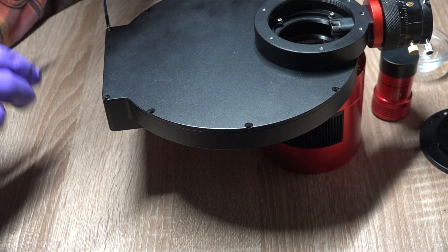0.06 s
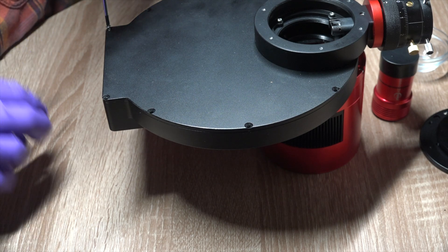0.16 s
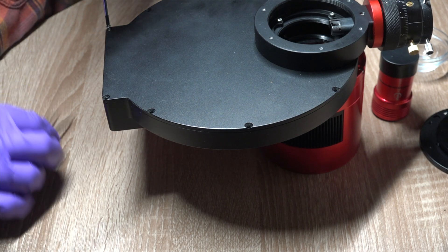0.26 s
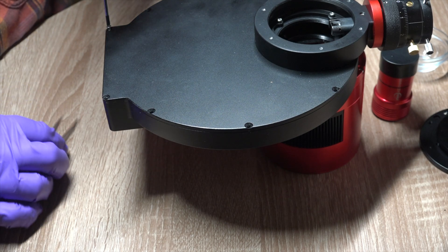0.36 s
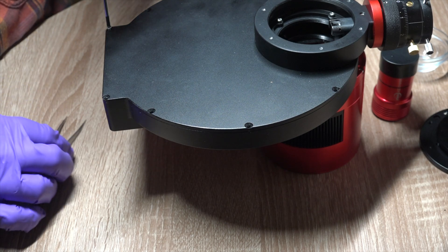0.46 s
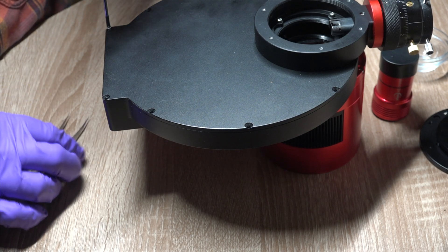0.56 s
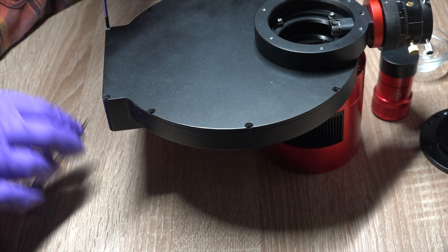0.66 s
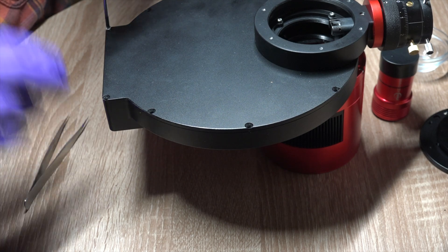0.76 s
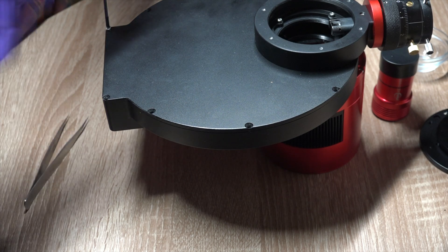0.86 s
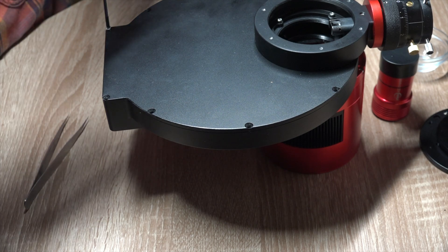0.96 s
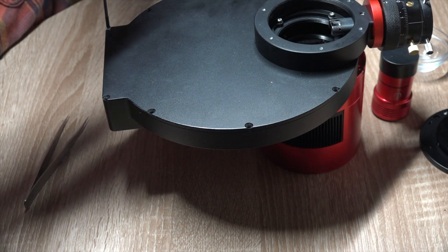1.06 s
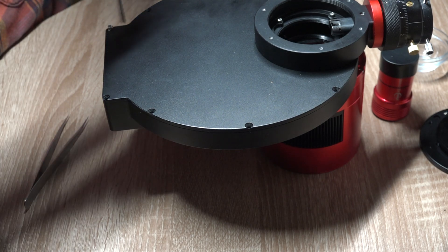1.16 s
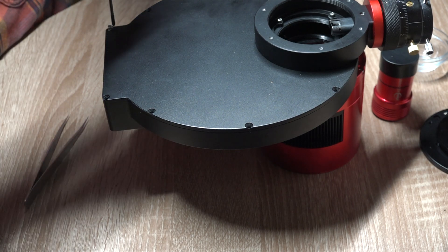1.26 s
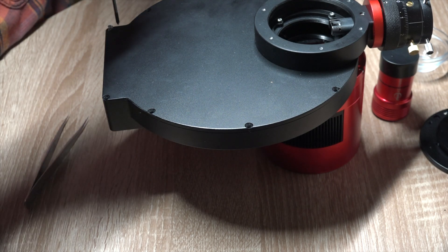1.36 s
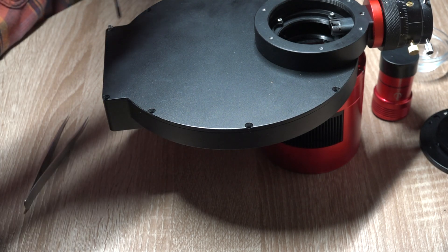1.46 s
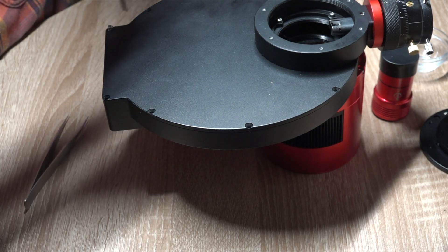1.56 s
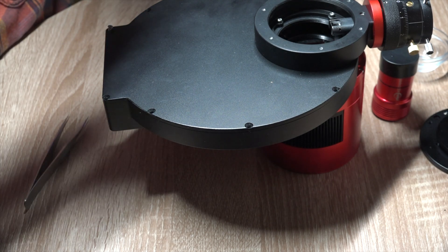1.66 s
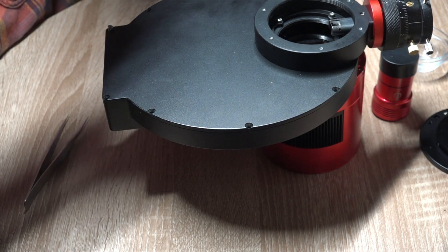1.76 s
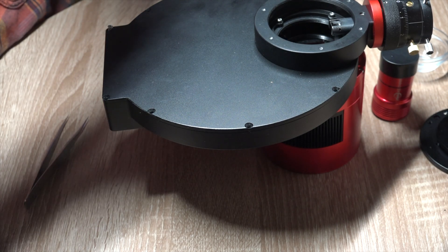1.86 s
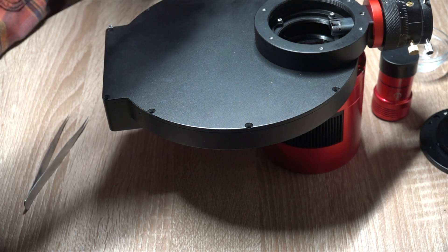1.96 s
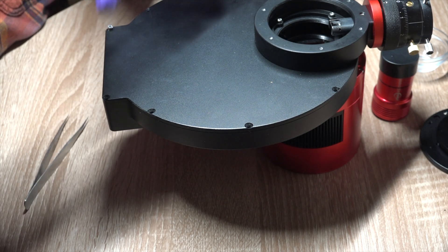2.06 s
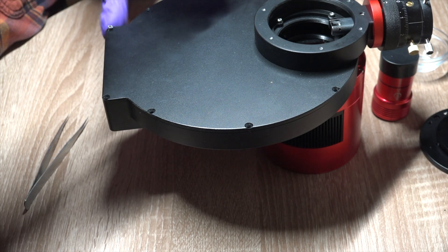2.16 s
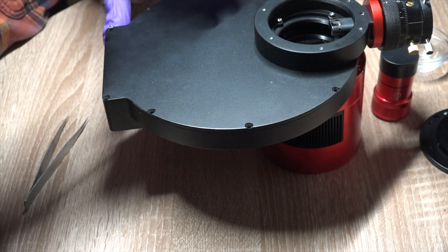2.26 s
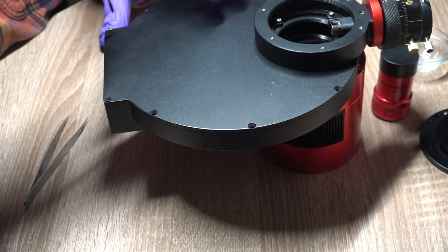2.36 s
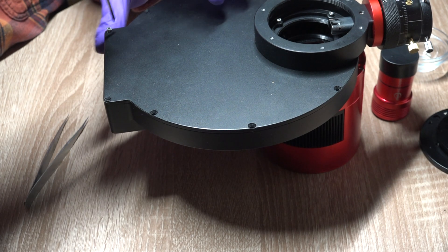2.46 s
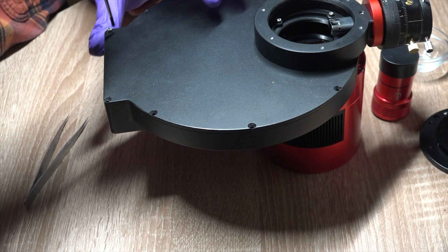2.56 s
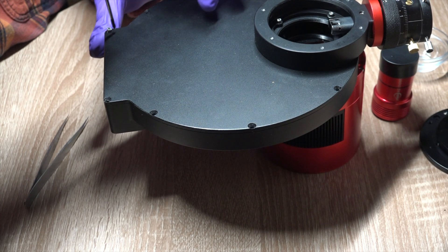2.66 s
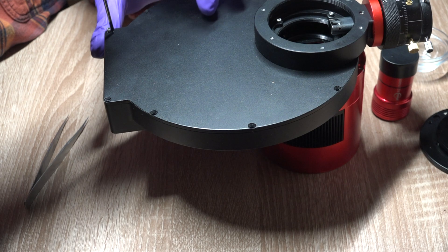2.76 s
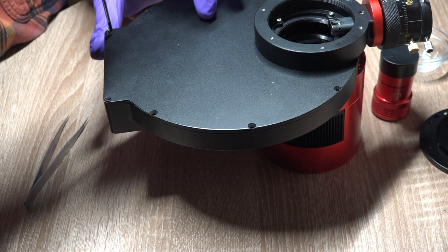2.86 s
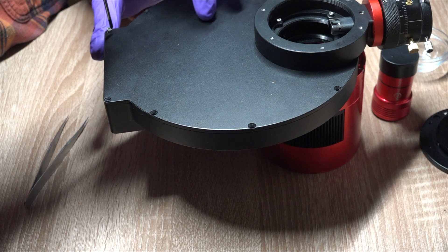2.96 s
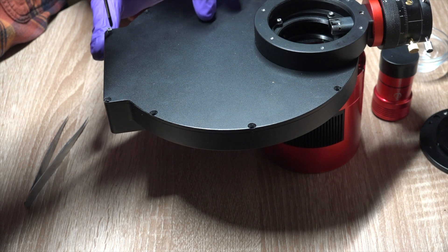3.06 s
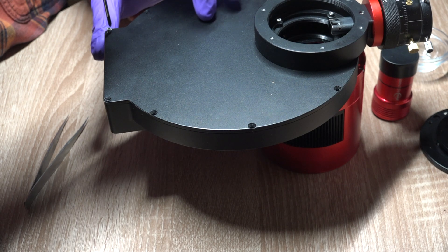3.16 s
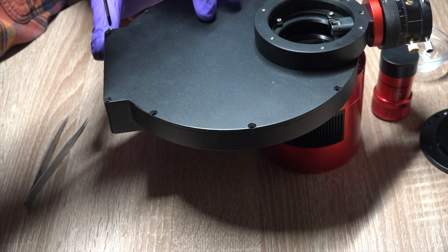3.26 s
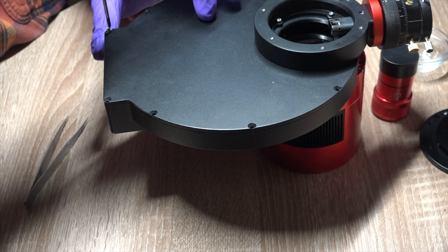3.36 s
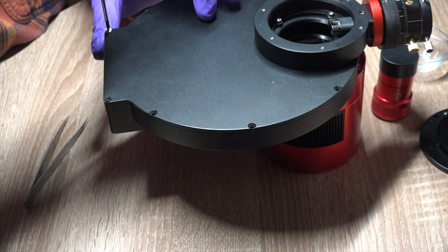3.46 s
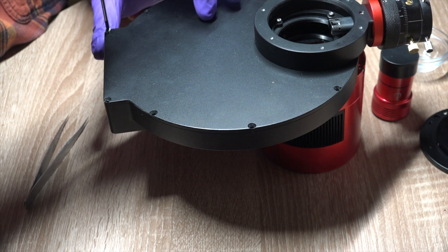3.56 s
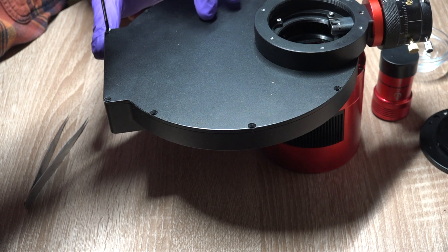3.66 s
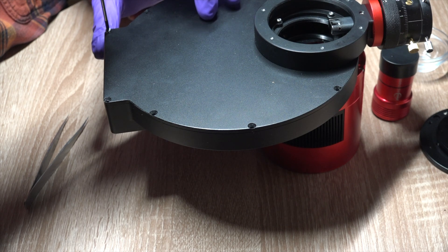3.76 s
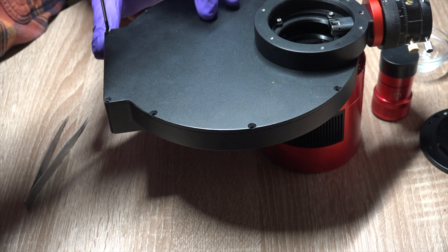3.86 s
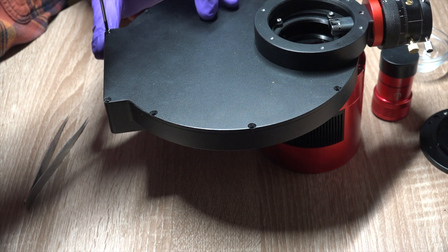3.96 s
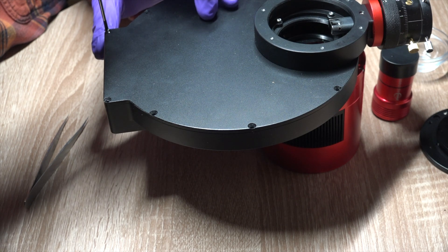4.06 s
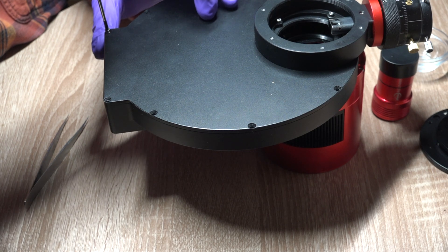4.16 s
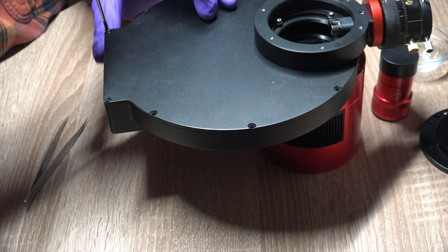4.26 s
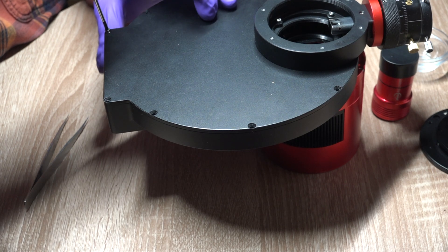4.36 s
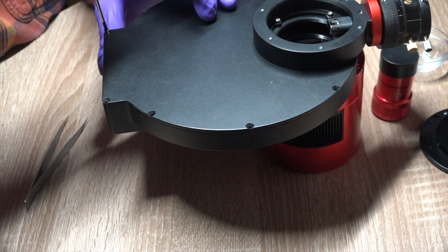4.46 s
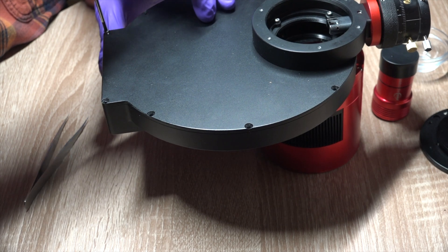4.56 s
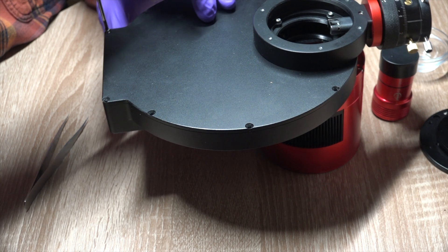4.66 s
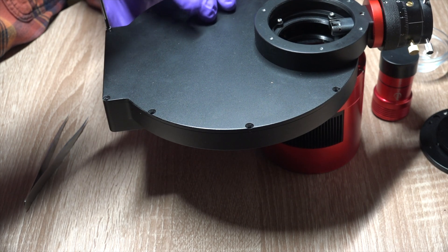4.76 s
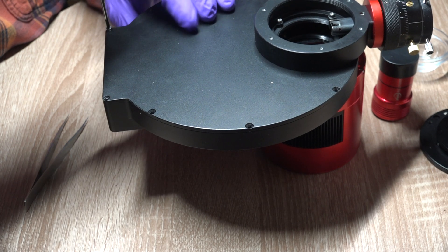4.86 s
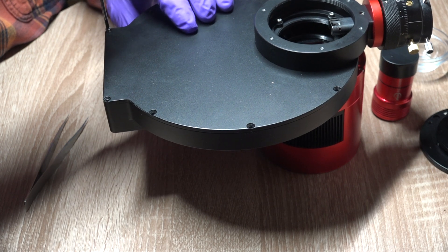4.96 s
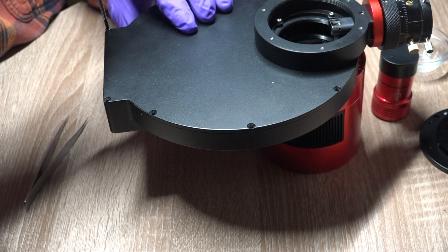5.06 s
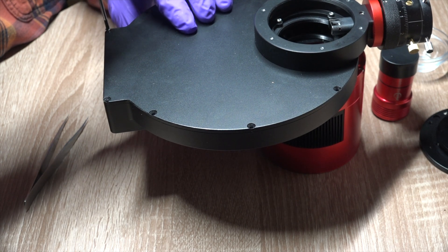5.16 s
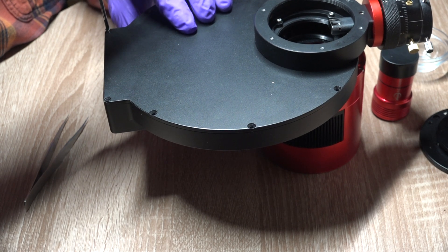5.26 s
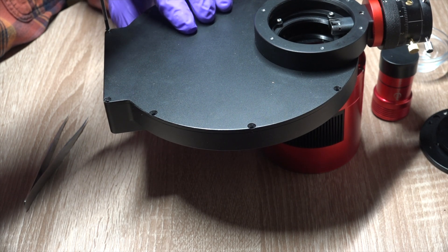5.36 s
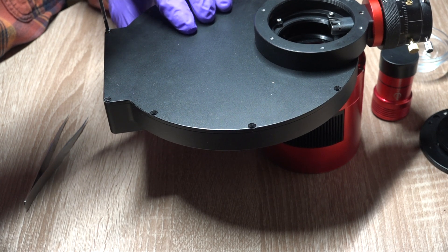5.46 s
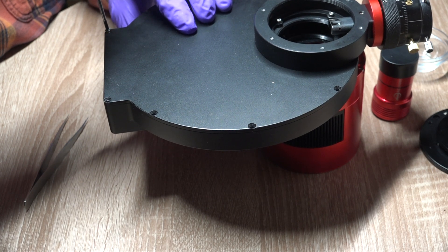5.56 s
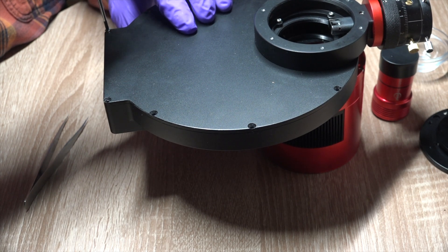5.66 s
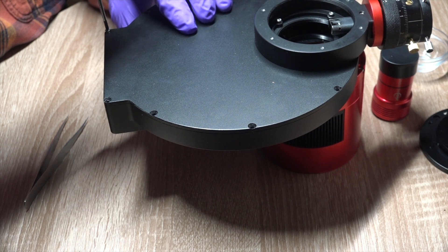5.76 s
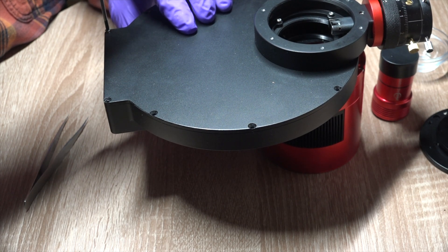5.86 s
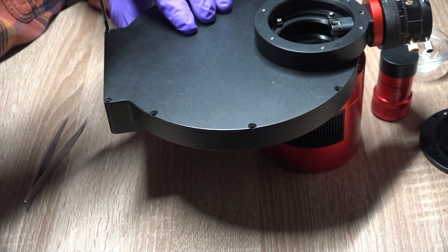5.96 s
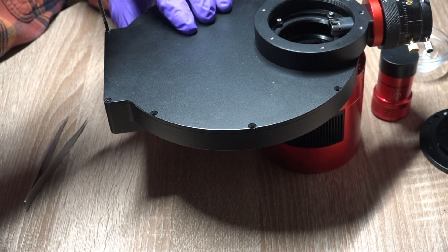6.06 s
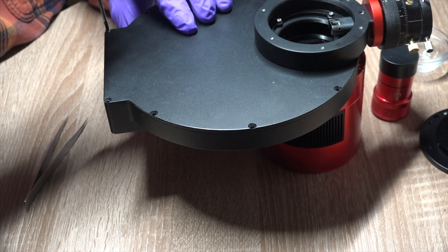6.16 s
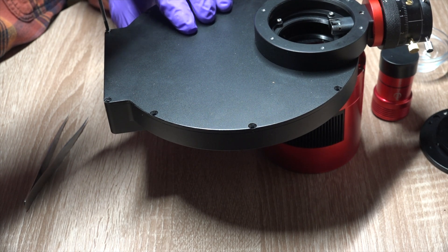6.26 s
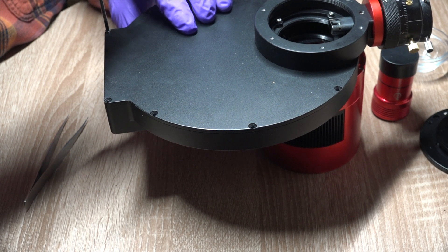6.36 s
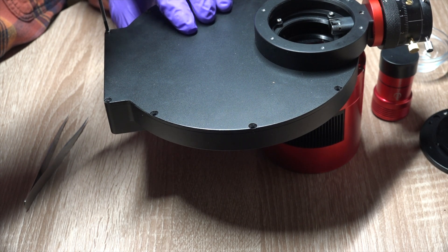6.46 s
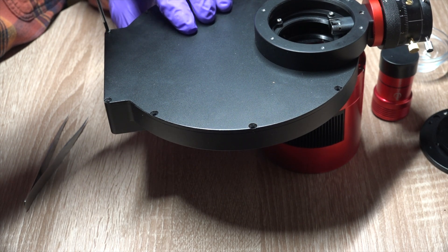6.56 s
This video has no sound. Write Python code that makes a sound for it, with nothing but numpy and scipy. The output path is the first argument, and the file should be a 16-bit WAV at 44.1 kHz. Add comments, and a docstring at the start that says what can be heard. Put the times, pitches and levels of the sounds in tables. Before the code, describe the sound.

Close tabletop work: tweezers click and slide on wood, gloves tick softly, small metal parts chink among low thuds, with quiet machine purr behind.

```python
"""Tweezers, key and screws at a wooden table

Steel tweezers are laid on the table and slid away; a thin key taps a metal housing and turns tiny screws. Low
thumps sound on the table, dull thuds come with a swish of cloth, gloves rustle and tick. Contacts are grainy
noise bursts ringing damped modes, rubbing is flickering coloured noise, and echoes follow. Behind lie a
machine's wavering sine hum, the knocking purr of a camera's lens drive and noise for the air."""
import sys
import numpy as np
from scipy import signal
from scipy.fft import rfft, irfft
from scipy.io import wavfile
from scipy.ndimage import uniform_filter1d

SR = 44100
rng = np.random.default_rng(int(sys.argv[2]) if len(sys.argv) > 2 else 0)


def wav_out(sig):
    """Save sig, one row per channel (or a flat mono array), as 16-bit PCM at SR to the path in sys.argv[1]."""
    wavfile.write(sys.argv[1], SR, np.round(np.clip(np.atleast_2d(sig).T, -1, 1) * 32767).astype(np.int16))


N = 291942  # length in samples

# dull thuds about twice a second, perhaps steps: t/s, level/dB, time to full pressure/ms, favoured f/Hz
THUD_HITS = [(4.738, -29, 4.6, 294), (5.279, -31.5, 2.5, 280), (5.757, -28.5, 3.2, 270),
             (6.254, -38.5, 5, 203)]
# modes of the wooden table top: f/Hz, level/dB
TABLE_MODES = [(108, -15.5), (135, 6), (180, 0), (250, -33), (335, 7), (450, -3.5), (620, 8.5), (760, 3.5),
               (1110, 7.5), (1400, 1), (2000, 4.5), (4400, -18.5)]
TABLE_T60_S = .016  # at 1 kHz
# modes of glove material: f/Hz, level/dB
GLOVE_MODES = [(2000, 16.5), (3500, 7.5), (5000, 9), (6500, 5), (8500, 8), (12000, -47)]
GLOVE_T60_S = .005  # at 1 kHz


def tweezer_hits():
    """Steel tweezers touch the table and ring briefly, damped by fingers and wood."""
    # contacts: t/s, level/dB, time to full pressure/ms, favoured f/Hz
    hits = [(.314, -46.5, 2.4, 2500), (.437, -18, 1.78, 1890), (.533, -41, 0.26, 2450),
            (.538, -22.5, 0.91, 2300), (.593, -36, 0.17, 2800), (.917, -49, 1.1, 3640),
            (1.112, -32.5, 6.7, 1010), (1.127, -29.5, 0.71, 2620), (1.136, -31, 4.8, 3730),
            (1.242, -23, 0.45, 1660), (1.258, -27.5, 0.69, 2660), (1.264, -30, 3.5, 2810),
            (1.310, -34.5, 0.9, 2480)]
    # steel modes: f/Hz, level/dB
    modes = [(380, 2), (590, 5), (1061, -2), (1300, 6), (1700, 6), (1950, 0), (2620, -6.5), (3100, -24),
             (3220, 4.5), (3800, -1), (3990, 4.5), (4600, 4), (4850, -1.5), (5529, 3), (6200, 2.5),
             (7154, 5), (7800, 6), (8866, -5.5), (11510, 4)]
    return strike(hits, modes, t60_s=.026, crack_db=-12,
                  least_fall_ms=3.2, fall_per_rise=2.1, spread_octaves=1.264, pan_db=1.1)


def tweezer_slide():
    """Tweezers drag over the wood grain: the noise catches at once, holds and fades evenly in dB."""
    # spectrum of the drag: f/Hz, level/dB
    spectrum = [(100, -38), (300, -16), (600, -10.5), (1200, -8.5), (2000, -3), (3200, -8.5), (5000, -14.5),
                (6200, -34), (8200, -37), (11000, -59), (15000, -48.5)]
    start_s, rise_s, hold_s, full_db = .512, .03, .071, -20.5
    full_s = start_s + rise_s
    slows_s = full_s + hold_s
    gain = stroke([(start_s, full_db - 26), (full_s, full_db),
                   (slows_s, full_db - 1.0), (slows_s + .5, full_db - 103.5)])
    return rub(colour(grit(N, 5.2), spectrum), gain, flicker_db=2.5, rate=180, pan_db=1.0)


def housing_taps():
    """The key taps a metal housing, whose modes ring for a moment."""
    # contacts: t/s, level/dB, time to full pressure/ms, favoured f/Hz
    hits = [(2.720, -52, 0.5, 2500), (2.765, -27.5, 1.6, 1610), (3.460, -57, 2.4, 2990),
            (3.476, -43.5, 0.59, 3060), (3.497, -44, 1.3, 2560), (3.548, -39.5, 1.8, 1500),
            (3.562, -45, 3, 1820), (4.105, -42, 22, 1460), (4.138, -44.5, 6, 1070)]
    # housing modes: f/Hz, level/dB
    modes = [(415, 1.5), (565, -14), (646, 8.5), (1290, 6), (1750, -3), (1900, 1), (2153, -11), (2665, 1),
             (3031, -4.5), (3488, 1), (3950, -1.5), (4457, 2.5), (4786, 0.5), (5491, -7), (7700, -1)]
    return strike(hits, modes, t60_s=.02, crack_db=-14.5,
                  least_fall_ms=8.9, fall_per_rise=0.26, spread_octaves=1.27, pan_db=0.74)


def screw_chinks():
    """Screw and key chink together, all modes shifting in pitch from contact to contact."""
    # contacts: t/s, level/dB, time to full pressure/ms, favoured f/Hz, reference ring f/Hz
    hits = [(4.698, -53.5, 3, 2000, 1910), (4.945, -45, 2.6, 2440, 2100), (4.959, -19, 6.6, 3020, 1746),
            (4.972, -35, 6.8, 1970, 1860), (4.983, -24, 1, 4000, 1784), (5.524, -40.5, 8.2, 1820, 1885),
            (5.568, -26.5, 0.99, 2800, 1764), (6.399, -43, 15, 3750, 1830), (6.450, -28.5, 22, 1850, 1808),
            (6.469, -18, 6.2, 3170, 1553), (6.503, -34, 2.2, 2690, 1630)]
    # modes of screw and key: multiple of the reference ring, level/dB
    modes = [(.68, -2), (.86, -38), (0.921, -22.5), (1, 14.5), (1.072, 14), (1.68, 9), (1.8, -24.5),
             (1.941, 13), (2.003, 8.5), (2.1, 0), (2.6, 1.5), (2.85, 3), (3.11, 5), (3.24, -1), (4.3, -5)]
    return strike(hits, modes, t60_s=.036, crack_db=-12,
                  least_fall_ms=5.3, fall_per_rise=0.82, spread_octaves=0.8, pan_db=0.6)


def key_grind():
    """The key grinds faintly in the screw head: noise rings it, swelling to each slip and then dying."""
    # turns: start t/s, slip t/s, level at the slip/dB
    turns = [(5.446, 5.482, -50), (5.83, 5.995, -53.5), (6.038, 6.077, -45.5)]
    # key modes: f/Hz, level/dB
    modes = [(1200, -27), (2100, 3), (2450, 1), (3000, 1), (3500, 5), (4750, 1)]
    swell_db, release_s = 13, 0.049
    gain = 0
    for start_s, slip_s, db in turns:
        gain = gain + stroke([(start_s, db - swell_db), (slip_s, db), (slip_s + release_s, db - swell_db)])
    grinding = signal.fftconvolve(grit(N, 1.1), damped(modes, .03))[:N]
    return rub(grinding, gain, flicker_db=3, rate=60, pan_db=1)


def pings():
    """Light touches each leave one thin tone ringing close to the favoured pitch."""
    # touches: t/s, level/dB, time to full pressure/ms, favoured f/Hz
    touches = [(.314, -42.5, 3.8, 392), (0.444, -36, 2.7, 3150), (1.263, -24, 2.57, 2693),
               (4.022, -54, .5, 3110), (5.338, -39.5, 7.1, 3530), (6.475, -20.5, 4.7, 3060)]
    hits = [(*touch, touch[-1]) for touch in touches]  # the favoured pitch also tunes the tone
    return strike(hits, [(0.96, 0)], t60_s=0.048, crack_db=-21,
                  least_fall_ms=6, fall_per_rise=.3, spread_octaves=.15, pan_db=1.2)


def low_thumps():
    """Short low thumps sound on the table, some close to the dull thuds: a strong crack of contact over short
    wooden modes."""
    # contacts: t/s, level/dB, time to full pressure/ms, favoured f/Hz
    hits = [(.314, -41, 1.2, 436), (.905, -48.5, 11, 246), (2.36, -50.5, 4, 256), (4.743, -33, 1.9, 1750),
            (5.205, -56, 5.6, 600), (5.839, -54, 2.5, 246), (6.19, -47.5, 18.4, 200),
            (6.545, -44, 3.9, 206)]
    return strike(hits, TABLE_MODES, TABLE_T60_S, crack_db=0.5,
                  least_fall_ms=6, fall_per_rise=.1, spread_octaves=1, pan_db=1.2)


def dull_thuds():
    """A smooth push under the chatter makes the wooden modes thud."""
    return strike(THUD_HITS, TABLE_MODES, TABLE_T60_S, crack_db=-3.5, weight=0.49,
                  least_fall_ms=5.2, fall_per_rise=0.077, spread_octaves=1.16, pan_db=0.55)


def cloth_swishes():
    """Cloth swishes just before each thud after the first, as a soft burst of broad noise."""
    lead_s, peak_db, rise_ms, centre_hz = .082, -53.5, 21, 9300
    hits = [(thud_s - lead_s, peak_db, rise_ms, centre_hz) for thud_s, *_ in THUD_HITS[1:]]
    return strike(hits, GLOVE_MODES, GLOVE_T60_S, crack_db=-6,
                  least_fall_ms=3, fall_per_rise=1, spread_octaves=3.2, pan_db=1)


def glove_ticks():
    """Gloves tick as they unstick, or swish where the rise is long."""
    # contacts: t/s, level/dB, time to full pressure/ms, favoured f/Hz
    hits = [(1.057, -49.5, 13, 4970), (1.0685, -39, 0.2, 9300), (1.809, -49, 0.44, 4260),
            (1.954, -44, 0.82, 5300), (2.1529, -36, 0.27, 4370), (2.163, -32, 0.69, 4160),
            (3.059, -74, .3, 2600), (4.403, -45.5, .3, 3000), (4.419, -51, 0.75, 3080),
            (4.507, -55.5, 0.26, 8000), (4.911, -54.5, .3, 3870), (5.706, -46.5, 0.51, 2640)]
    return strike(hits, GLOVE_MODES, GLOVE_T60_S, crack_db=2.5,
                  least_fall_ms=.6, fall_per_rise=4.5, spread_octaves=0.73, pan_db=1.1)


def rustle():
    """Gloves and sleeves rub: coloured grainy noise that swells and sinks."""
    # strength of the rubbing: t/s, level/dB
    swells = [(0.0, -66), (.18, -67.5), (.55, -54.5), (.8, -65.5), (1.1, -60.5), (1.26, -56.5), (1.42, -68),
              (1.66, -59), (1.81, -61.5), (2.1, -58.5), (2.51, -67.5), (3.23, -90), (3.91, -67.5),
              (4.09, -62), (4.7, -66.5), (5.12, -60), (5.73, -63), (6.62, -59.5)]
    # spectrum of the rubbing: f/Hz, level/dB
    spectrum = [(300, -19), (1000, -3.5), (2200, 1), (4500, 1.5), (8000, -4), (11000, -14), (15000, -10.5)]
    return rub(colour(grit(N, 1), spectrum), stroke(swells), flicker_db=1.5, rate=25, pan_db=1.5)


def mic_lean(x):
    """The microphone favours the left port in the mids, so left and right are coloured oppositely."""
    # balance: f/Hz, left minus right level/dB
    balance = [(100, 2), (300, .6), (600, 7), (1400, 2.5), (3000, 0.1), (10000, 0.5)]
    hz, lean_db = np.transpose(balance)
    left = colour(x[0], np.transpose([hz, lean_db / 2]))
    right = colour(x[1], np.transpose([hz, -lean_db / 2]))
    return np.array([left, right])


def room(x):
    """Diffuse echoes build up over a few ms, each band of noise dying at its own rate."""
    # reverberation: f/Hz, t60/s
    decay = [(150, 0.35), (1000, 0.38), (3000, 0.34), (8000, 0.29), (14000, 0.05)]
    room_db, side_db = -2.5, -25.5
    t = np.arange(SR // 2) / SR
    tail = 0
    for hz in 90 * 2 ** np.arange(0, 7.6, .5):  # half-octave bands
        edges = [hz / 2 ** .25, hz * 2 ** .25]
        band = signal.butter(2, edges, "bandpass", fs=SR, output="sos")
        t60 = on_log_hz(decay, hz)
        noise = signal.sosfilt(band, rng.standard_normal((2, len(t))))
        tail = tail + noise * np.exp(-np.log(1000) * t / t60) / np.sqrt(t60)
    tail = tail * (1 - np.exp(-t / 0.001))
    tail = tail / np.sqrt((tail[0] ** 2).sum())
    ears = tail[0] + undb(side_db) * tail[1] * np.array([[1], [-1]])
    return undb(room_db) * signal.fftconvolve(x, ears, axes=1)[:, :N]


def machine_hum():
    """A machine hums: a few sine lines wander in level and phase."""
    # hum lines ahead of the microphone's bass cut: f/Hz, level/dB
    lines = [(57, -70.5), (101, -73), (120, -66), (240, -76)]
    t = np.arange(N) / SR
    hum = 0
    for hz, db in lines:
        gain = undb(db + 2.0 * walk(2.3)) * np.sqrt(2)  # sine peak from rms
        phase = 2 * np.pi * hz * t + 0.38 * walk(9.8) + 7 * rng.random()
        hum = hum + gain * np.sin(phase)
    return hum


def lens_drive():
    """The lens drive purrs beside the microphone: near-regular soft knocks ring its case."""
    # case modes: f/Hz, level/dB, t60/s
    case_modes = [(520, -25, 0.01), (700, -6, 0.11), (1086, 9, 0.04), (4650, 2.5, 0.011)]
    # the drive works harder for a while: t/s, level/dB
    effort = [(0, -72), (1.9, -70), (2.3, -64), (4.6, -66.5), (4.9, -68), (6.63, -68)]
    start_s, knock_hz = .0222, 29.97
    steps = np.arange(start_s, N / SR - .01, 1 / knock_hz)
    time_chance, level_chance = rng.standard_normal((2, len(steps)))
    knocks = np.zeros(N)
    places = ((steps + .0002 * time_chance) * SR).astype(int)
    knocks[places] = undb(2 * level_chance)
    purr = signal.fftconvolve(knocks, ring(*np.transpose(case_modes)))[:N]
    return level(purr, 0) * stroke(effort)


def air():
    """Room tone and microphone hiss: noise shared by both channels plus noise opposed between them."""
    # noise spectrum: f/Hz, relative level per Hz/dB
    spectrum = [(21, -49), (35, -8.5), (113, -3), (185, -11), (238, -9), (408, -13.5), (527, -12),
                (663, -16), (1080, -13), (1710, -20), (3970, -26), (4870, -22.5), (5680, -24.5),
                (7920, -23.5), (15800, -28)]
    # stereo width: f/Hz, side minus mid level/dB
    width = [(60, -28), (110, -8.5), (200, -5), (380, -7), (700, -4.5), (1290, -1), (2380, -30.5),
             (4400, -17.5), (8120, 4.5), (15000, -10.5)]
    mid, side = colour(rng.standard_normal((2, N)), spectrum)
    gain = undb(-60 + .7 * walk(1.3)) / np.std(mid)
    return gain * (mid + colour(side, width) * np.array([[1], [-1]]))


def strike(hits, modes, t60_s, crack_db, least_fall_ms, fall_per_rise, spread_octaves, pan_db, weight=0):
    """Uneven chatter rings the modes, and a separate grainy burst with the same pressure is heard as a crack;
    weight adds a smooth push."""
    out = np.zeros((2, N + SR))
    t_ms = np.arange(SR // 8) / SR * 1e3
    lead = SR // 100  # room for the pitch filter to smear ahead of the contact
    octaves = np.log2(np.maximum(np.fft.rfftfreq(SR // 2, 1 / SR), 1))
    for s, peak_db, rise_ms, centre_hz, *pitch_hz in hits:
        fall_ms = least_fall_ms + fall_per_rise * rise_ms
        press = np.minimum(t_ms / rise_ms, 1) ** 2 * np.exp(-np.maximum(t_ms - rise_ms, 0) / fall_ms)
        chatter = press * (grit(len(t_ms), 4.4) + weight)
        crack = press * grit(len(t_ms), 3.1)
        sound = signal.fftconvolve(chatter, damped(modes, t60_s, *pitch_hz, scatter_db=1.2))
        sound[:len(t_ms)] += undb(crack_db) * crack * np.linalg.norm(sound) / np.linalg.norm(crack)
        # how hard and where it lands favours one region of pitch
        favour = np.exp(-.5 * ((octaves - np.log2(centre_hz)) / spread_octaves) ** 2)
        sound = irfft(rfft(np.pad(sound, (lead, 0)), SR // 2) * favour)
        top = np.sqrt(uniform_filter1d(sound ** 2, size=SR // 200).max())  # loudest 5 ms
        i = int(s * SR) - lead
        out[:, i:i + len(sound)] += sound / top * undb(peak_db + np.array([[pan_db], [-pan_db]]) / 2)
    return out[:, :N]


def rub(x, gain, flicker_db, rate, pan_db):
    """Two surfaces catch and slip, so the level flickers around its shape."""
    x = level(x, 0) * undb(flicker_db * walk(rate)) * gain
    return x * undb(np.array([[pan_db], [-pan_db]]) / 2)


def grit(count, db):
    """Noise whose samples differ in size like grains."""
    return rng.standard_normal(count) * undb(db * np.minimum(rng.exponential(size=count), 3.5))


def damped(modes, t60_s, pitch_hz=1, scatter_db=0):
    """Ring of (frequency, dB) modes whose high ones die sooner; t60_s holds at 1 kHz."""
    hz, db = np.transpose(modes)
    hz = hz * pitch_hz
    return ring(hz, db + scatter_db * rng.standard_normal(len(hz)), t60_s * (hz / 1000) ** -.4)


def ring(hz, db, t60):
    """Response of a set of decaying modes to one push."""
    t = np.arange(SR // 4)[:, None] / SR
    decay = np.exp(-np.log(1000) * t / t60)
    return (undb(db) * np.sin(2 * np.pi * hz * t) * decay).sum(axis=1)


def walk(rate):
    """Random levels held 1 / rate s and smoothed twice into a slow wander."""
    k = int(SR / rate)
    held = np.repeat(rng.standard_normal(N // k + 1), k)
    return 0.8 * uniform_filter1d(uniform_filter1d(held, k), k)[:N]


def stroke(points):
    """Gain along (s, dB) corners, practically silent before and after."""
    s, db = np.transpose(points)
    return undb(np.interp(np.arange(N) / SR, s, db, left=-150, right=-150))


def colour(x, table):
    """Filter by a spectrum of (Hz, dB) points."""
    gain = undb(on_log_hz(table, np.fft.rfftfreq(x.shape[-1], 1 / SR)))
    return irfft(rfft(x) * gain, x.shape[-1])


def on_log_hz(table, hz):
    """Value of (Hz, value) points, joined on a log-frequency axis."""
    f, v = np.transpose(table)
    return np.interp(np.log(np.maximum(hz, 1)), np.log(f), v)


def level(x, db):
    """Scale to an rms level in dB."""
    return x * undb(db) / np.sqrt(np.mean(x ** 2))


def undb(db):
    """Amplitude factor of a level in dB."""
    return 10 ** (np.asarray(db) / 20)


def scene():
    """Handling and thuds with their echoes, over the hum, purr and air."""
    hands = tweezer_hits() + tweezer_slide()
    hands += housing_taps() + screw_chinks() + key_grind() + pings()
    hands += low_thumps() + dull_thuds() + cloth_swishes()
    hands += glove_ticks() + rustle()
    hands = mic_lean(hands)
    return hands + room(hands) + machine_hum() + lens_drive() + air()


def record(dry):
    """The microphone weakens the lowest bass and cuts the top steeply."""
    low_hz, top_hz = 70.47, 15800
    x = signal.sosfilt(signal.butter(2, low_hz, "highpass", fs=SR, output="sos"), dry)
    return signal.sosfilt(signal.ellip(10, .2, 60, top_hz, fs=SR, output="sos"), x)


dry = scene()
out = record(dry)
wav_out(out)
```